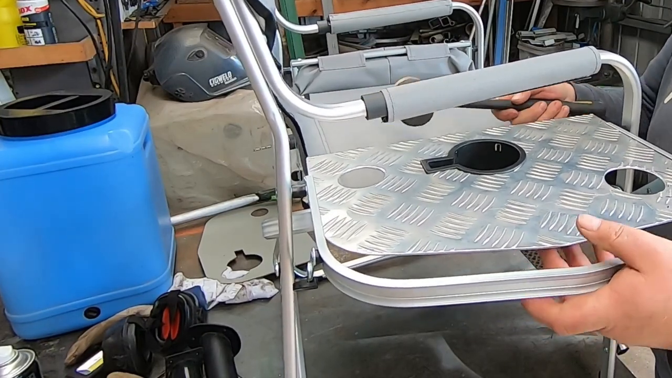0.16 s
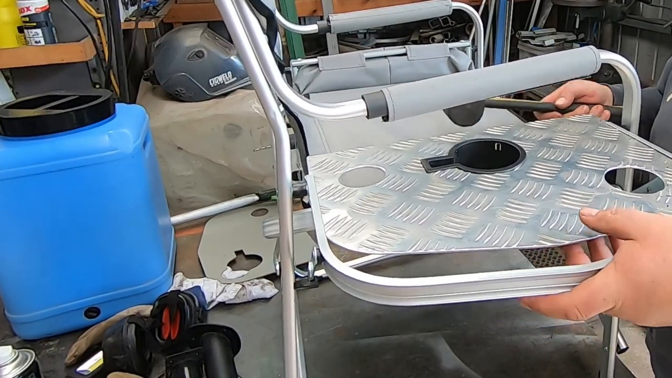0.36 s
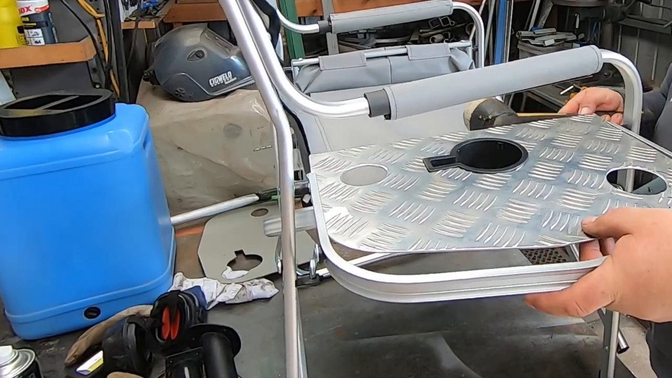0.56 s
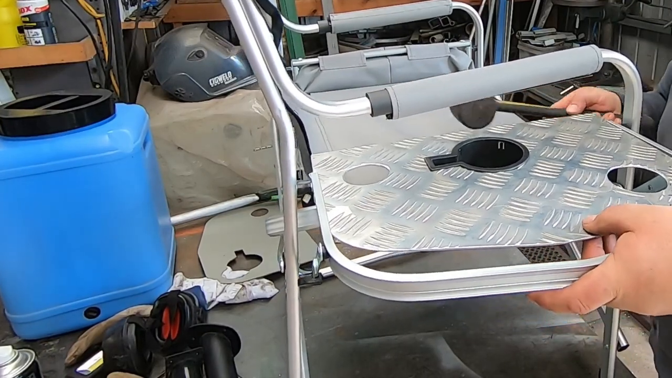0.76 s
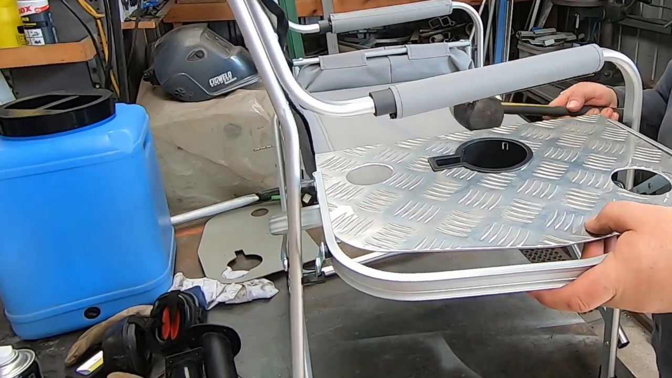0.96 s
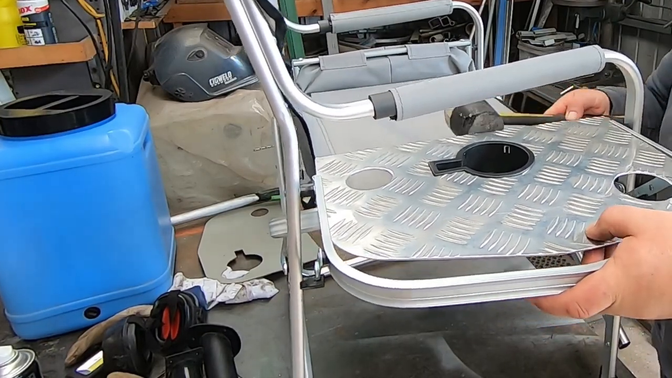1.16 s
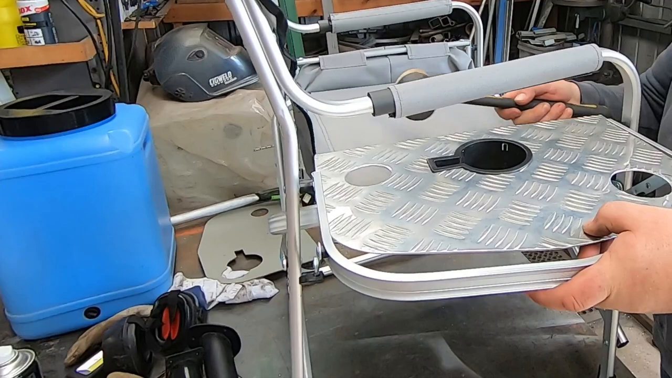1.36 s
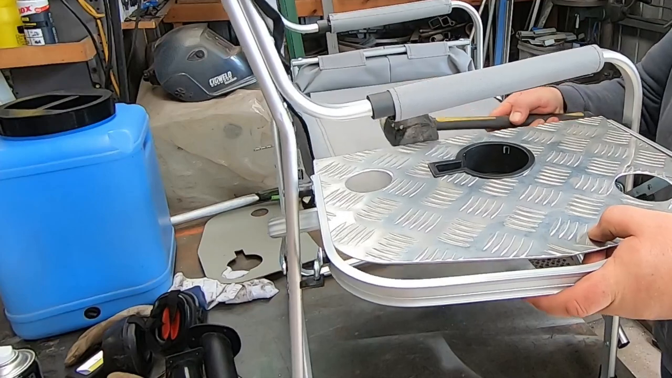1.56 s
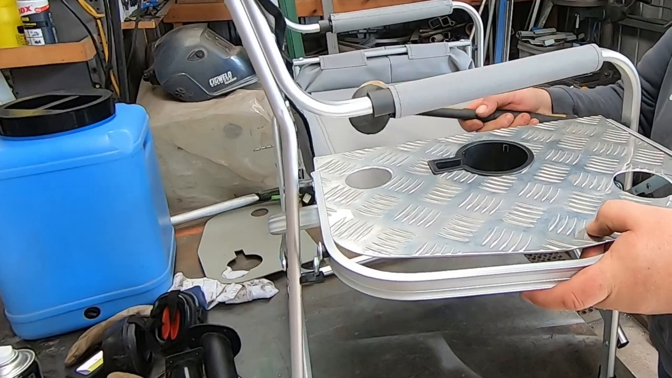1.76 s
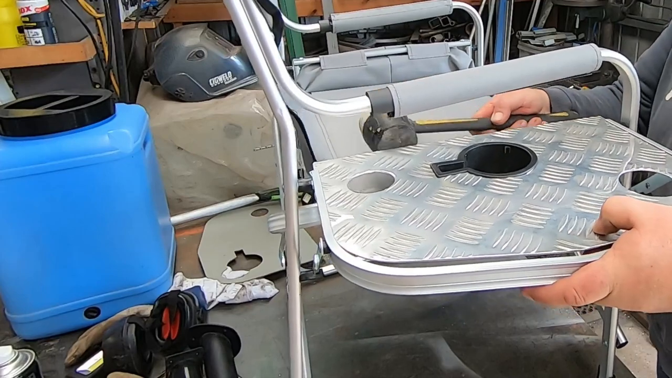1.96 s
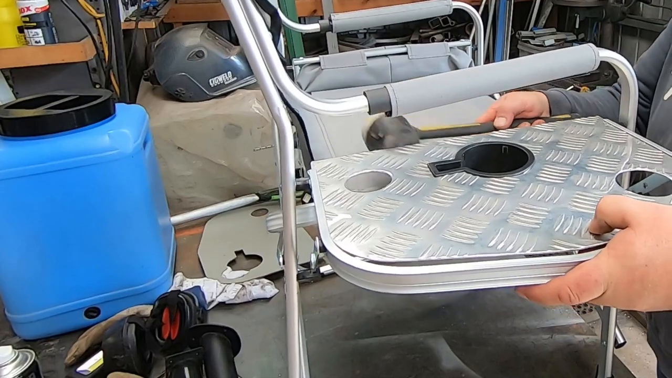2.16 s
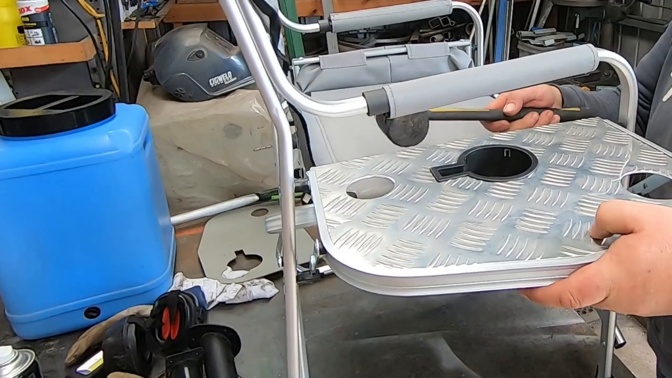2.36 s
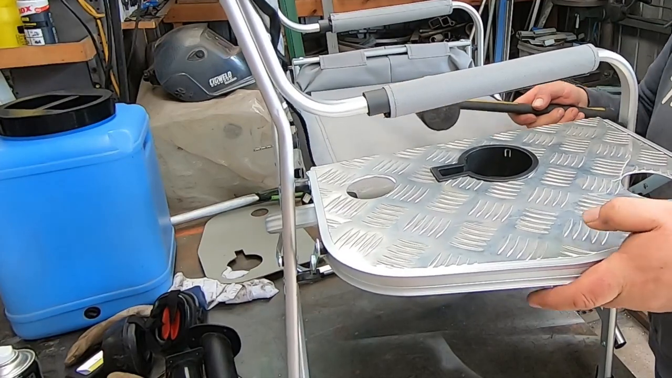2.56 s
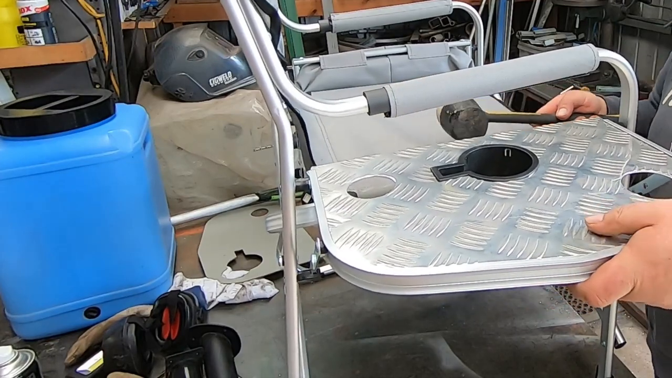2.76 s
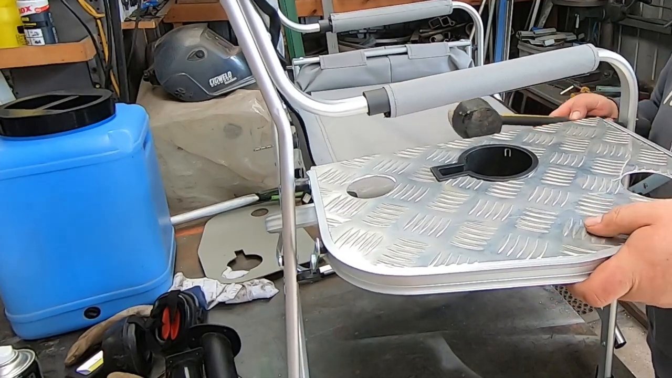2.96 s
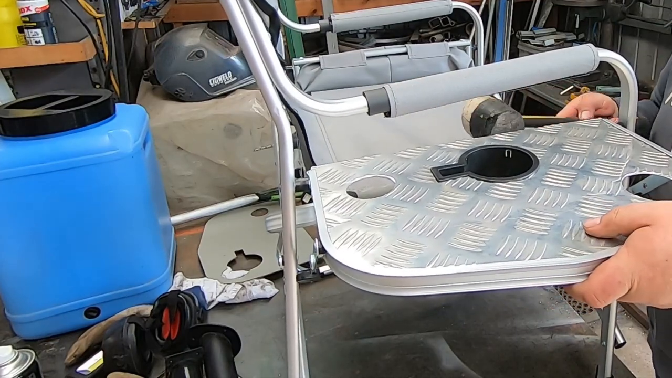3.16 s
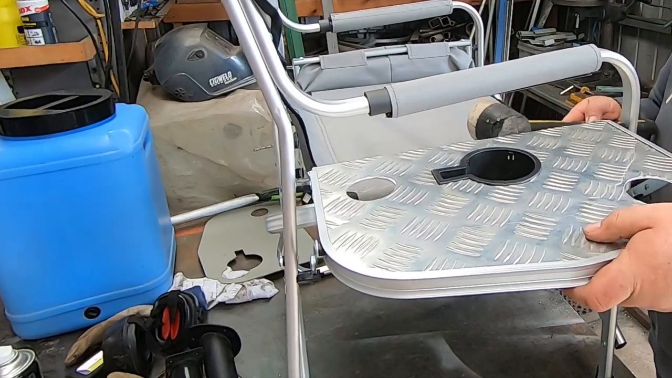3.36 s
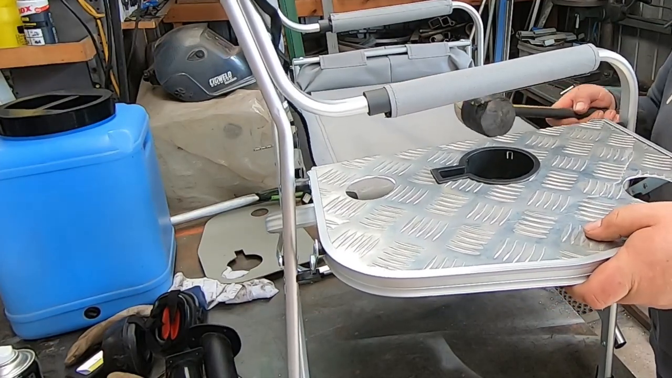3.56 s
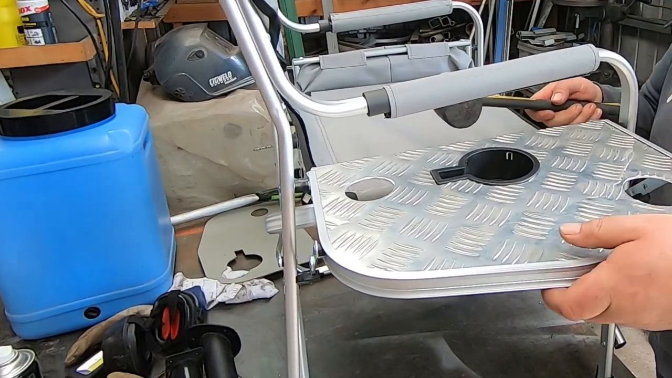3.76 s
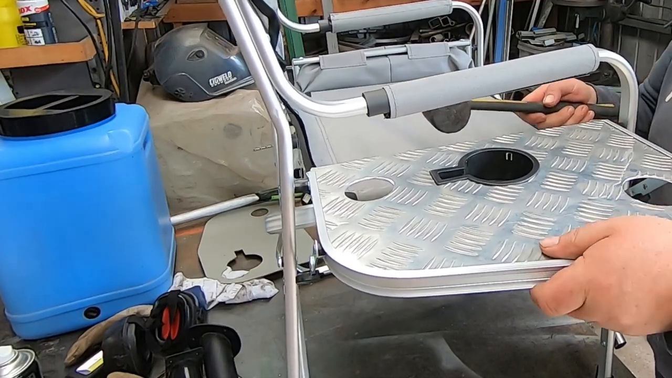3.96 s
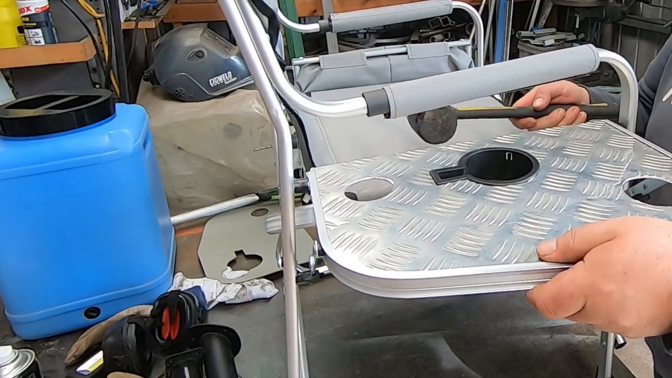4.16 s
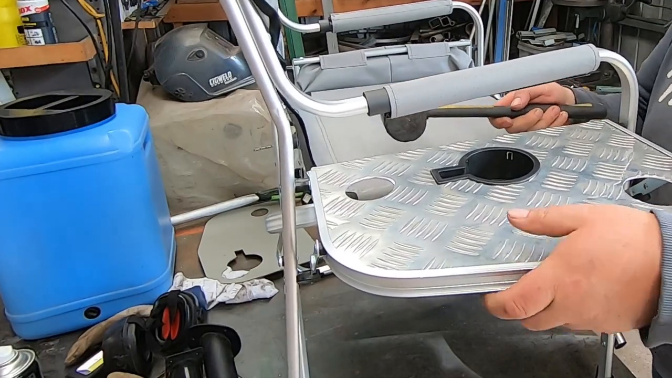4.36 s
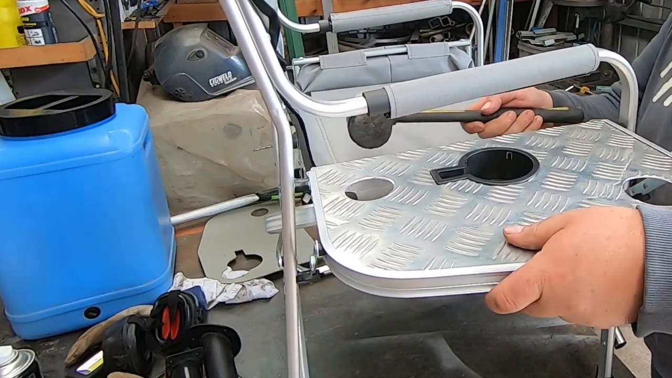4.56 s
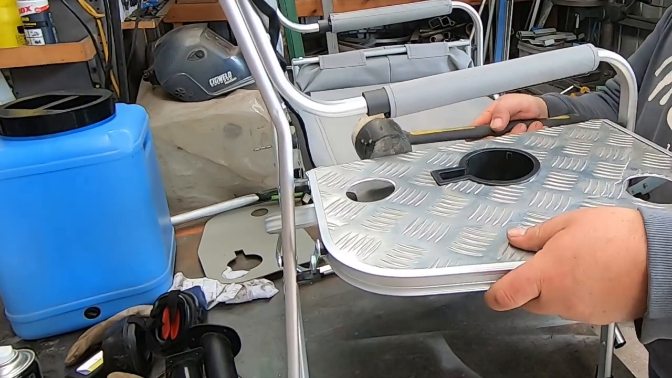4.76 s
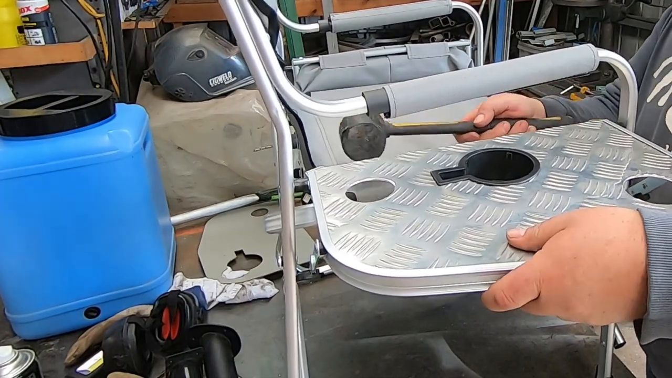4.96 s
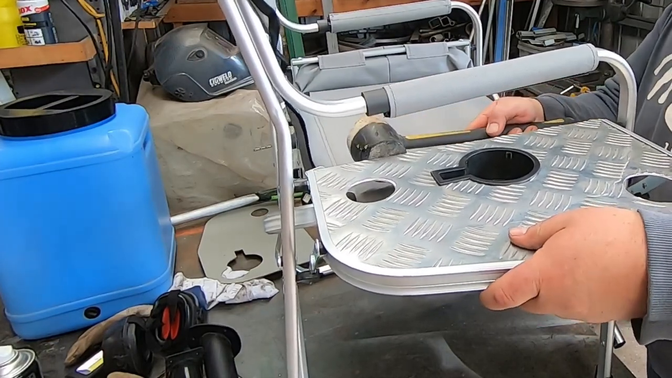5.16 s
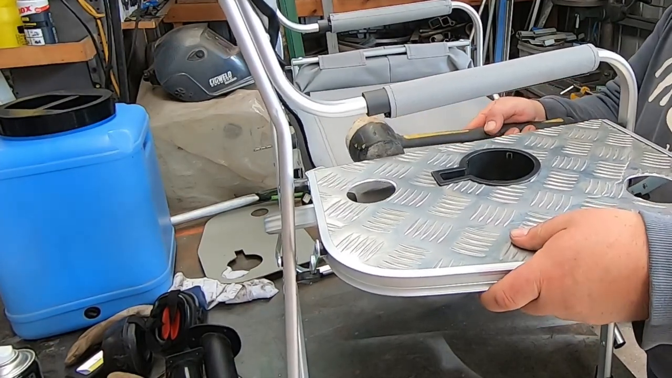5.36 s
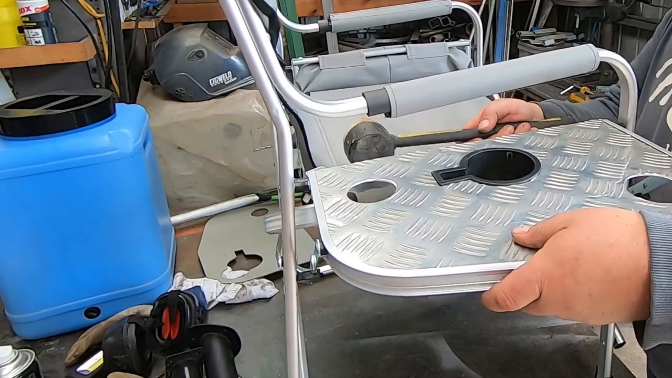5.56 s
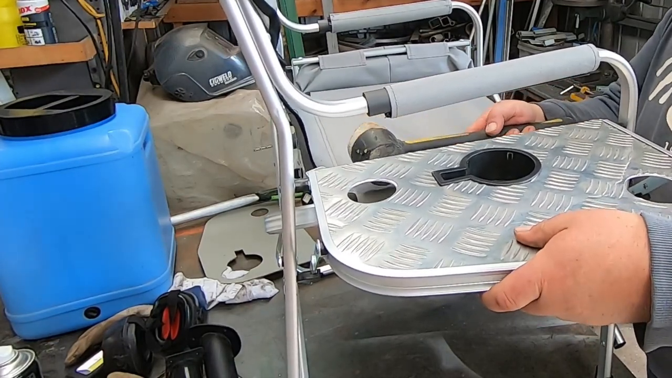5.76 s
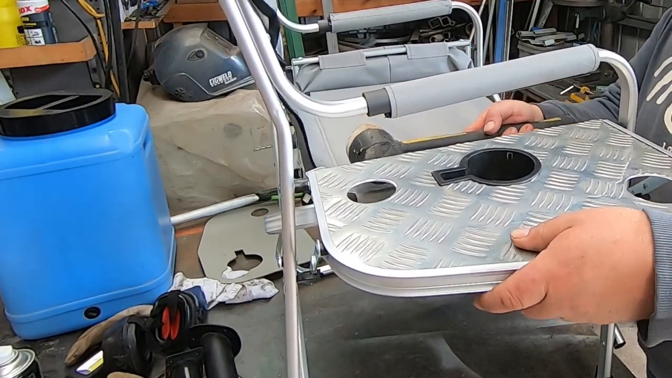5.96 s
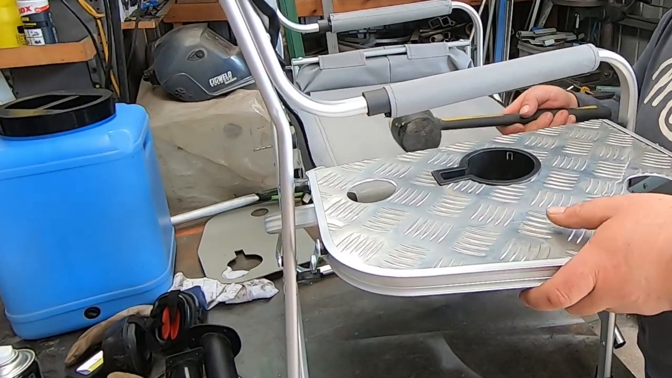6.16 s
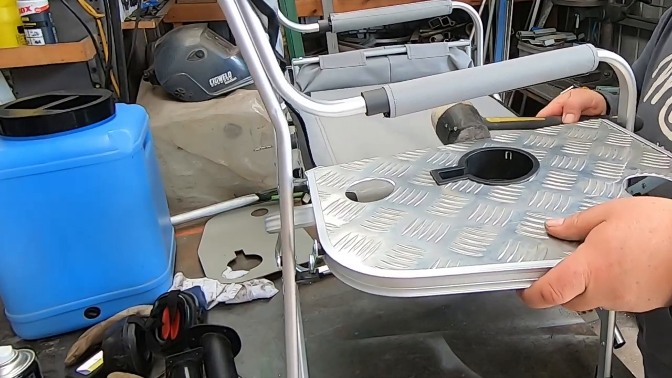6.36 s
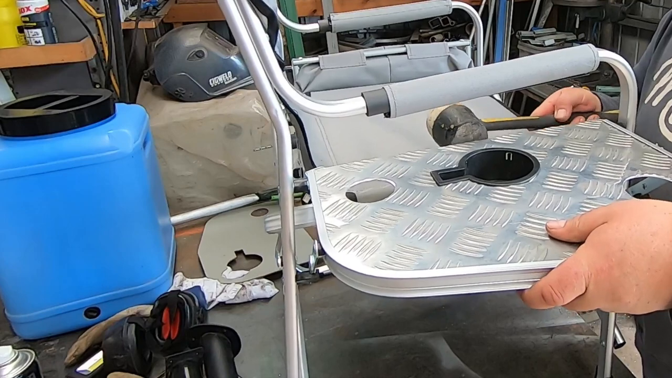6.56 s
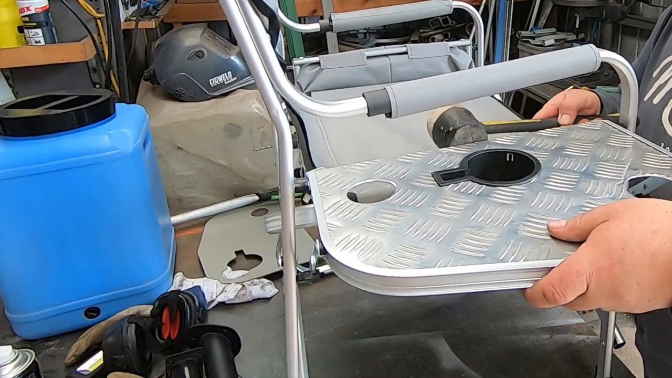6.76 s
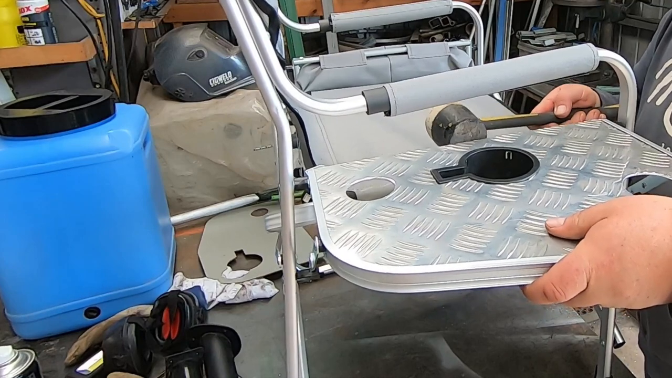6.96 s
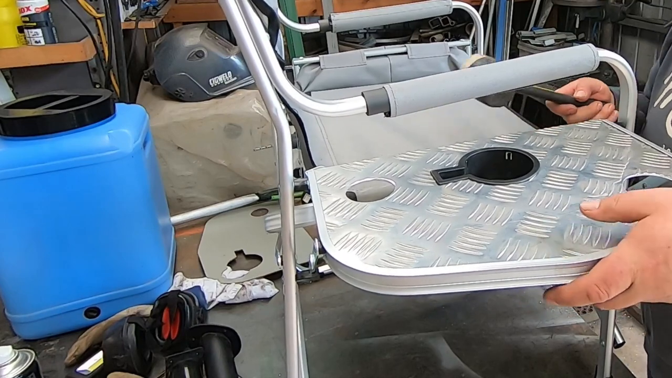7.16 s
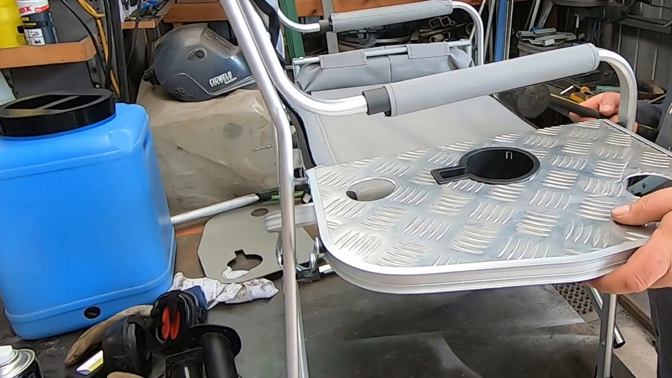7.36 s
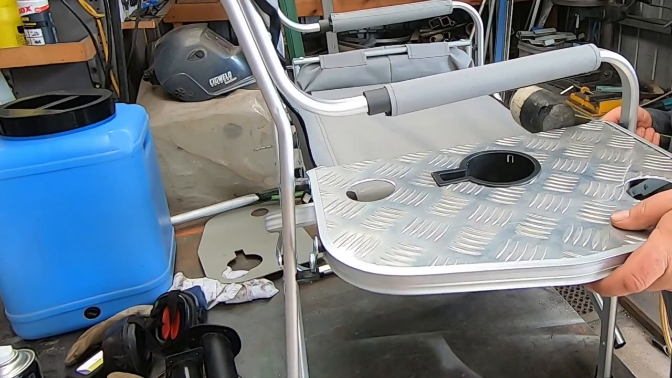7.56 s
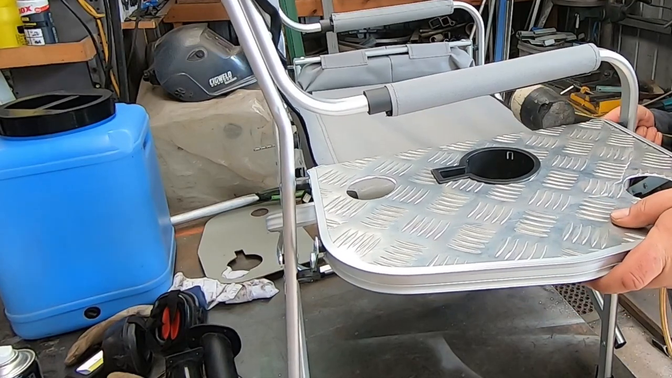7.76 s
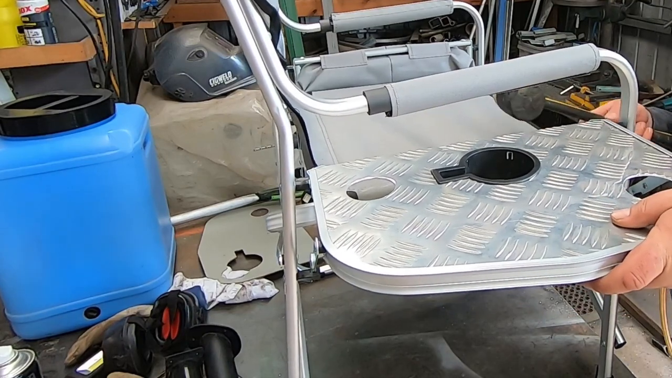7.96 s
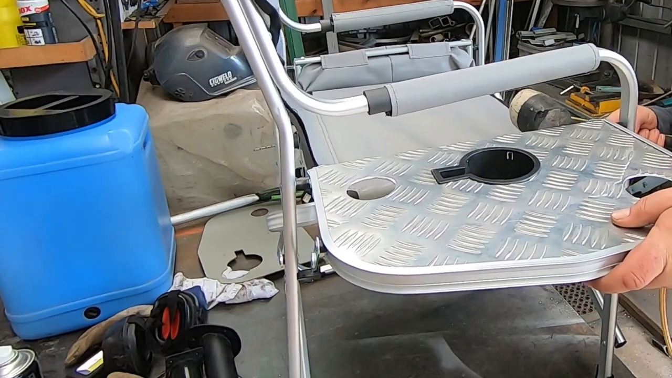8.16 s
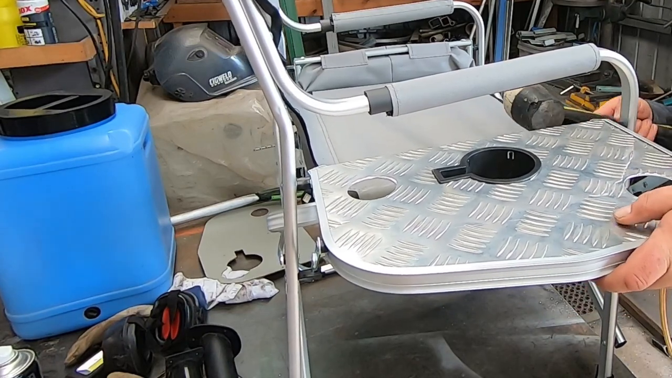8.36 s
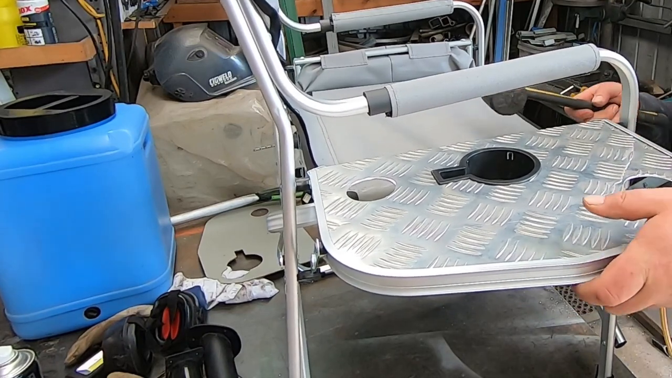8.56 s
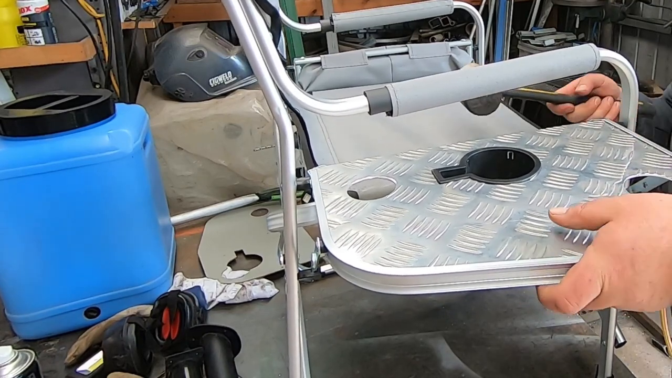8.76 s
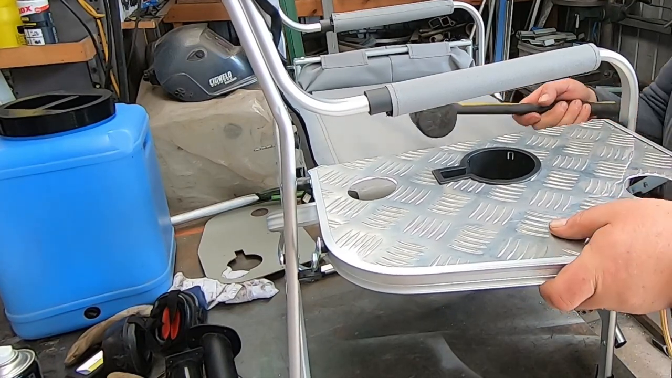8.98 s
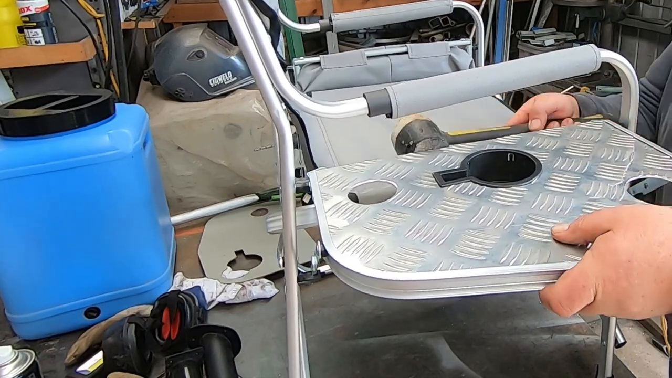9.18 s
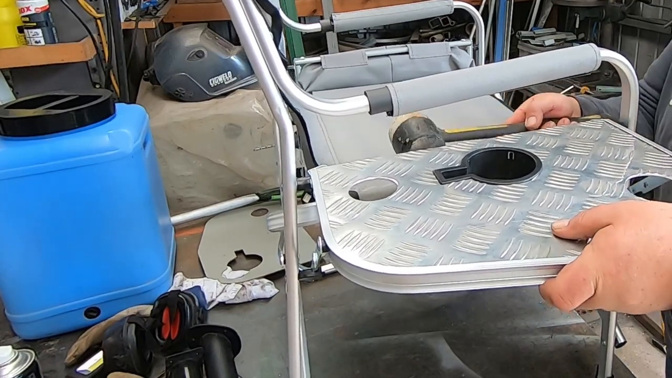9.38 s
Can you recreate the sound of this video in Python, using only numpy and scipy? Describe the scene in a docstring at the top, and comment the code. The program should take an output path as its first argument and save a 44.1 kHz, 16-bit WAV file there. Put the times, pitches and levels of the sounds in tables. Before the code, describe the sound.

Loud, abrupt blows on thin metal plate, each a crack with a nearly simultaneous slap, hollow knock, clattering clang and dull thud, fading in about half a second. A fast first run with bouncing bumps gives way to a weak tap, then separate firmer hits and pairs. Between them the plate ticks and shifts, its rim clinks, and a hand slides briefly along the tube. Close stereo pickup, small live room, faint background hiss.

```python
"""A mallet drives an aluminium tread plate into the tube frame of a folding chair, in a small workshop.
Each blow is a crack and a slap of noise, a hollow knock, coloured noise for the clang and thud, and fading
sine waves for the ringing tubes and the booming, swaying frame. Early on, the loose plate drops back after
every blow; later it sits tighter. Between blows it ticks, bumps and clinks, and the hand rubs along the
frame. A quiet murmur of filtered noise fills the workshop."""
import sys
import numpy as np
from scipy import signal
from scipy.fft import rfft, irfft, next_fast_len
from scipy.io import wavfile

SR = 44100
rng = np.random.default_rng(int(sys.argv[2]) if len(sys.argv) > 2 else 0)


def unload_audio(sound):
    """Save the sound as a 16-bit wav file, at the path given as the first command line argument."""
    columns = np.transpose(np.atleast_2d(sound))
    # keep every value between -1 and 1, then stretch to whole-number steps
    steps = np.round(np.clip(columns, -1, 1) * 32767)
    wavfile.write(sys.argv[1], SR, steps.astype(np.int16))


N = 415411  # length in samples
AGE = np.arange(SR * 9 // 10) / SR  # time since a sound began, s
SEATED_S = 2.9  # from this time the plate's edge sits in the frame: it no longer jumps, and booms differently


def from_db(db):
    """Turn decibels into a gain."""
    return 10 ** (np.asarray(db) / 20)


def at_hz(points, hz):
    """Read a table between its points, on a logarithmic pitch axis."""
    points = np.array(points)
    return np.interp(np.log(hz + 1), np.log(points[:, 0]), points[:, 1])


def add(track, s, sound):
    """Mix a sound in at a time, which may lie before the start."""
    start = round(s * SR)
    first, last = max(start, 0), min(start + sound.shape[-1], N)
    track[:, first:last] += sound[:, first - start:last - start]


def white(size):
    """Two independent noises, one for the middle and one for the sides."""
    return rng.standard_normal((2, size))


# How alike left and right are in the room's sound: (f/Hz, likeness -1..1)
ROOM_ALIKE = [(40, .9), (100, .98), (250, .95), (500, .85), (1000, .42), (2000, .54), (4500, .5),
              (7000, .1), (9000, 0)]
# Left-right balance of the room's sound: (f/Hz, left minus right level/dB)
ROOM_SIDES = [(200, 1.3), (500, -1.5), (1000, -2.5), (2200, -0.73), (4500, -.4), (7000, -2.9), (9000, 3.5)]


def coloured(noise, spectrum, tilt_db=0, likeness=ROOM_ALIKE, balance=ROOM_SIDES):
    """Left and right noise with a spectrum, a tilt per octave above 1 kHz and a stereo image; rms 1."""
    size = noise.shape[-1]
    padded = next_fast_len(size)
    hz = np.fft.rfftfreq(padded, 1 / SR)
    mid, side = rfft(noise, padded)
    alike = at_hz(likeness, hz)
    left_right = np.array([[1], [-1]])
    both = np.sqrt(1 + alike) * mid + left_right * np.sqrt(1 - alike) * side
    level_db = at_hz(spectrum, hz) + tilt_db * np.log2(np.maximum(hz, 1000))
    level_db = level_db + left_right * at_hz(balance, hz) / 2
    out = irfft(both * from_db(level_db) * (hz > 20), padded)[:, :size]
    return out / out.std()


def uneven(noise, depth_db, width_hz):
    """The plate's modes bunch at random, so that some narrow bands stand out."""
    hz = np.fft.rfftfreq(noise.shape[-1], 1 / SR)
    bumps = rng.standard_normal(600)
    level_db = depth_db * np.interp(hz / width_hz, np.arange(len(bumps)), bumps)
    return irfft(rfft(noise) * from_db(level_db), noise.shape[-1])


def swell(rise_s, t60):
    """Height of a vibration that builds up, then dies away by 60 dB in t60 seconds."""
    return np.sqrt(1 - np.exp(-AGE / rise_s)) * from_db(-60 * AGE / t60)


# How long the room rings: (f/Hz, time to fall 60 dB t/s)
ROOM_DECAY = [(60, .6), (200, 0.6), (600, 0.51), (1500, 0.53), (4000, 0.52), (8000, 0.42), (13000, .36)]


def in_room(noise, feed_s, direct):
    """Crowded modes feed the room for a moment; then each band dies at the room's own rate."""
    hz = np.fft.rfftfreq(len(AGE), 1 / SR)
    spectrum = rfft(noise)
    centres, t60s = np.transpose(ROOM_DECAY)
    out = 0
    # each row of the identity matrix picks one band, overlapping its neighbours
    for pick, t60 in zip(np.eye(len(centres)), t60s):
        band = irfft(spectrum * at_hz(np.c_[centres, pick], hz), len(AGE))
        out = out + band * from_db(-60 * AGE / t60)
    straight_power = direct * (1 - np.exp(-AGE / 0.0037))
    room_power = 2 * (1 - np.exp(-AGE / feed_s)) ** 2
    return out * np.sqrt(straight_power + room_power)


def ring(hz, level_db, t60, rise_s, spread_db, phase_spread):
    """Fading sine modes, each struck with its own strength and reaching the two sides out of step."""
    out = 0
    for f, db, decay in zip(hz, level_db, t60):
        phase = rng.uniform(0, 2 * np.pi) + phase_spread * rng.standard_normal((2, 1))
        gain = from_db(db + spread_db * rng.standard_normal())
        out = out + gain * swell(rise_s, decay) * np.sin(2 * np.pi * f * AGE + phase)
    return out


def shifted(hz, share):
    """The frame's stress shifts its modes a little, at random, by a share of their pitch."""
    return hz * (1 + share * rng.standard_normal(len(hz)))


def flutter(per_s):
    """A smooth random wobble around zero, its spread a little under one."""
    steps = rng.standard_normal(2000)
    return np.interp(np.arange(N) / SR * per_s, np.arange(len(steps)), steps)


# The plate's play in the frame, which the blows take up: (t/s, play 1 loose to 0 tight)
LOOSENESS = [(0, 1), (1.63, 1), (1.95, 0.67), (3.47, 0.55), (4.81, .55), (5.2, 0.22), (8.14, 0)]


def with_play(rule, s):
    """A setting (value when tight, change at full play) that follows the plate's play at that time."""
    tight, change = rule
    return tight + change * np.interp(s, *np.transpose(LOOSENESS))


# Tone of metal hitting metal: (f/Hz, relative level/dB per Hz)
CRACK_TONE = [(40, -17.5), (150, -17.5), (400, -13), (900, -3), (1500, 3.5), (2200, 3), (3400, 4.5),
              (5500, 2), (7000, 1), (8500, -10), (10000, -8.5), (11300, -29), (14500, -36.5)]
# How alike left and right are straight from the plate: (f/Hz, likeness -1..1)
DIRECT_ALIKE = [(200, 0.76), (1000, 0.99), (5000, 0.98), (7000, 0.82), (8800, 0.46), (12000, 0.78)]
# Left-right balance straight from the plate: (f/Hz, left minus right level/dB)
DIRECT_SIDES = [(200, 2), (500, 1), (1000, -11), (2200, -3), (4500, -2), (7000, -2), (9000, 1.5)]


def crack(tilt_db, t60):
    """Metal meets metal: a brief burst of bending waves, heard straight from the plate."""
    size = len(AGE) // 10
    waves = uneven(white(size), depth_db=4.0, width_hz=350)
    burst = coloured(waves, CRACK_TONE, tilt_db, DIRECT_ALIKE, DIRECT_SIDES)
    return burst * swell(0.00013, t60)[:size]


# Pairs: (when tight, change at full play). A loose plate sounds duller: tilt in dB per octave.
CONTACT_DB, CRACK_TILT_DB = (-11, -2), (0.5, -1.3)
CONTACT_FOLLOWS = .55  # share of a blow's strength in dB that shows in crack and slap


def contact(s, strength_db, slap_s, slap_db):
    """The mallet's crack and the plate's slap on the tube share the force of one blow."""
    out = np.zeros((2, len(AGE)))
    tilt_db = with_play(CRACK_TILT_DB, s)
    first = crack(tilt_db, t60=0.046)
    second = from_db(slap_db) * crack(tilt_db, t60=0.037)
    lag = round(slap_s * SR)
    out[:, :first.shape[-1]] += first
    out[:, lag:lag + second.shape[-1]] += second
    level_db = with_play(CONTACT_DB, s) + CONTACT_FOLLOWS * strength_db
    return out * from_db(level_db) / np.hypot(1, from_db(slap_db))


# The hollow sound of the mallet head: (f/Hz, relative level/dB, time to fall 60 dB t/s)
HEAD_MODES = [(373, -2, 0.033), (570, -5, 0.023)]
KNOCK_DB = (-28.5, 10.5)  # when tight, change at full play


def knock(s):
    """The hollow mallet head knocks with two short-lived modes."""
    modes = ring(*np.transpose(HEAD_MODES), rise_s=0.00079, spread_db=0.5, phase_spread=0.09)
    return from_db(with_play(KNOCK_DB, s)) * modes


# Thin ringing of the aluminium tubes: (f/Hz, relative level/dB, time to fall 60 dB t/s)
TUBES = [(1070, -18, 0.45), (1260, -16, 0.63), (1530, -19, 0.75), (1572, -13.5, .5), (2550, -23, 0.38),
         (3130, -10.5, 0.5), (3410, -20.5, 0.47), (3470, -39, 0.96), (5820, -14, 0.46), (6777, -15.5, .35),
         (7700, -17.5, .35), (10100, -22.5, 0.39)]
TUBE_DB = (-28.5, 4.5)  # when tight, change at full play


def tube_ring(s):
    """The aluminium tubes ring thinly, each mode slightly off its usual pitch."""
    hz, level_db, t60 = np.transpose(TUBES)
    modes = ring(shifted(hz, .008), level_db, t60, rise_s=.002, spread_db=1.0, phase_spread=0.29)
    return from_db(with_play(TUBE_DB, s)) * modes


def rattle(late_s=.04, fade_db_per_s=110, count=7):
    """The plate chatters on the tube for a moment after a blow, on the whole ever more weakly."""
    out = np.zeros((2, len(AGE)))
    for wait, size in rng.standard_normal((count, 2)):
        s = min(.014 + abs(wait * late_s), .2)
        tick = from_db(2 * size - fade_db_per_s * s) * crack(0, t60=0.019)
        out += np.pad(tick, ((0, 0), (round(s * SR), len(AGE))))[:, :len(AGE)]
    return out


# Tone of the ringing plate: (f/Hz, relative level/dB per Hz)
CLANG_TONE = [(300, -20.5), (700, -8), (1000, -1.5), (1550, -2), (1800, -1), (3100, -2), (3900, -2),
              (4500, -4.5), (5700, -2), (7400, -3), (8600, -7.5), (9900, -7), (11300, -25), (14500, -26)]
CLANG_DB = -22.5
CLANG_TILT_DB = (0.14, -1.3)  # dB per octave: when tight, change at full play


def clang(s, plate, kept_share=0.45):
    """The plate rattles and its crowded modes ring: always the same plate, struck at slightly different spots."""
    modes = np.sqrt(kept_share) * plate + np.sqrt(1 - kept_share) * white(len(AGE))
    modes = uneven(modes, depth_db=0.96, width_hz=160)
    modes = coloured(modes, CLANG_TONE, with_play(CLANG_TILT_DB, s))
    return from_db(CLANG_DB) * (rattle() + in_room(modes, feed_s=0.044, direct=0.72))


# Tone of the jolted chair: (f/Hz, relative level/dB per Hz)
THUD_TONE = [(25, -24.5), (55, -8), (100, -4.5), (200, 0.5), (280, -1.5), (400, -1.5), (650, -3),
             (900, -6.5), (1500, -13.5), (4000, -41.5), (12000, -68)]
THUD_DB = (-30, 5.5)  # when tight, change at full play


def thud(s):
    """The whole chair is jolted: dull noise that feeds the room."""
    jolt = in_room(coloured(white(len(AGE)), THUD_TONE), feed_s=0.053, direct=0.96)
    return from_db(with_play(THUD_DB, s)) * jolt


# Low modes of plate and frame:
# (f/Hz, relative level/dB with the plate loose, relative level/dB with it seated, time to fall 60 dB t/s)
FRAME_MODES = [(67.9, -15.5, -17, 0.54), (100, -2.5, -13, 0.67), (117, -2, -7.5, 0.49),
               (136.4, -3.5, -2, 0.27), (157.9, -12, -3, .35), (202.3, -4, -2.5, 0.46),
               (214.8, -2, -7, 0.47), (268.7, -7, -8, 0.37), (307, -7.5, -15, 0.39), (382.6, -6, -17, 0.63),
               (467.5, -4.5, -17.5, 0.61), (502, -11, -23.5, .6), (572, -11, -19, 0.15),
               (624, -4, -19, 0.53), (674, -5, -23.5, 0.58)]
BOOM_DB = -23.5


def boom(s, boom_db):
    """Plate and frame boom in low modes, whose balance changes once the plate is seated."""
    hz, loose_db, seated_db, t60 = np.transpose(FRAME_MODES)
    mode_db = loose_db if s < SEATED_S else seated_db
    modes = ring(shifted(hz, .012), mode_db, t60, rise_s=0.02, spread_db=3.5, phase_spread=.075)
    return from_db(BOOM_DB + boom_db) * modes


# Mallet blows: (t/s, strength level/dB against a usual blow, delay of the plate's slap on the tube t/s,
# slap level/dB against the crack, boom level/dB against the strength)
HITS = [(-.022, 2, .0065, -6, -8), (0.5535, -2.04, .0058, 2, -9), (0.9135, 0.5, 0.0043, 6, -7.5),
        (1.2587, -.5, 0.01, 0.5, -3.5), (1.6338, 0, .0084, 3, -4.5), (1.951, -2, .003, -4, -8),
        (2.293, -4, 0.0092, -0.5, -5), (3.1577, -12, .013, 10, 2), (3.4682, -4, .006, 3, 0),
        (4.8107, 0.1, .0078, -2.5, 0), (5.1955, 2, 0.0017, 0, -1), (6.4076, -2, 0.006, 2, -4),
        (6.8584, 1.5, 0.0015, -5, -3), (7.6789, 0.9, .0055, -1, -5.5), (8.1404, 0, 0.007, -6.5, 1),
        (9.2545, -1, .0018, 13, -6.5)]


def hammering():
    """Each blow cracks and slaps, knocks, clangs, rings the tubes, jolts the chair and makes it boom."""
    out = np.zeros((2, N))
    plate = uneven(white(len(AGE)), depth_db=2.0, width_hz=70)
    for s, strength_db, slap_s, slap_db, boom_db in HITS:
        body = knock(s) + clang(s, plate) + tube_ring(s) + thud(s) + boom(s, boom_db)
        add(out, s, contact(s, strength_db, slap_s, slap_db) + from_db(strength_db) * body)
    return out


# Centres of clusters of close modes that sing on:
# (f/Hz, level/dB of each mode before its random spread, time to fall 60 dB t/s)
SINGING = [(1225, -40.5, 0.4), (1930, -44, 0.32), (3030, -48, 0.44), (3400, -44, 0.58), (3620, -38, 0.35),
           (3700, -43, 0.46)]
SINGING_S = 3.472  # one blow lands where the frame is free to sing
SWAY_HZ, SWAY_T60, SWAY_DB = 46, 0.5, -49  # Hz, s, dB at a usual blow


def frame_ring(cluster_width=.014, count=4):
    """The whole chair sways deeply under each blow; once its tubes sing on, beating against each other."""
    out = np.zeros((2, N))
    for s, strength_db, *_ in HITS:
        sway_db = strength_db + SWAY_DB
        add(out, s, ring([SWAY_HZ], [sway_db], [SWAY_T60], rise_s=.06, spread_db=2.5, phase_spread=.35))
    hz, level_db, t60 = np.transpose(SINGING * count)
    hz = shifted(hz, cluster_width)
    add(out, SINGING_S, ring(hz, level_db, t60, rise_s=.002, spread_db=2.5, phase_spread=0.34))
    return out


# Tone of the quiet workshop: (f/Hz, relative level/dB per Hz)
SHOP_TONE = [(25, -12), (60, -9.5), (90, -21), (160, -1), (210, 0.5), (320, -8), (500, -11.5), (830, -9),
             (1500, -13), (4000, -21.5), (6500, -24.5), (10000, -37), (11500, -52), (15000, -54.5)]
SHOP_DB = -57.5


def background():
    """The workshop's quiet low murmur and hiss: filtered noise whose level wavers slightly."""
    return from_db(SHOP_DB + .7 * flutter(per_s=6.3)) * coloured(white(N), SHOP_TONE)


# Tone of the plate dropping back: (f/Hz, relative level/dB per Hz)
DROP_TONE = [(30, -24), (70, -14), (110, 9), (210, 6), (300, -2), (450, -1), (700, -2), (1000, -7),
             (1600, -8.5), (4000, -44), (12000, -56)]
# How hard it lands, until its edge catches in the frame: (t/s, level/dB against the blow)
LANDING_FORCE = [(0, -12.5), (.91, -1.5), (1.95, 1.5), (2.3, -14)]
FLIGHT_S, DROP_DB = .128, -23.5  # a loose plate lands this long after the blow


def drops(room_db=-9):
    """The loose plate jumps at a blow and lands with a dull bump that echoes in the room."""
    out = np.zeros((2, N))
    for s, strength_db, *_ in HITS:
        if s < SEATED_S:
            bump = coloured(white(len(AGE)), DROP_TONE) * swell(0.022, 0.26)
            echo = in_room(coloured(white(len(AGE)), DROP_TONE), feed_s=0.11, direct=0)
            db = DROP_DB + strength_db + np.interp(s, *np.transpose(LANDING_FORCE))
            add(out, s + FLIGHT_S, from_db(db) * (bump + from_db(room_db) * echo))
    return out


# The plate shifting in the frame: (t/s, tick level/dB, bump level/dB)
SHIFTS = [(.382, -38.5, -38.5), (0.8304, -34.5, -49), (2.238, -51, -41), (2.6004, -65, -41),
          (2.63, -40.5, -65), (3.2451, -37.5, -46), (4.789, -42.5, -45), (5.161, -64.5, -39),
          (6.694, -65, -42.5), (6.821, -35.5, -40), (7.421, -44, -59), (7.5958, -65, -45),
          (7.619, -51.5, -65), (8.108, -44.5, -46.5)]
# Tone of the soft bumps: (f/Hz, relative level/dB per Hz)
BUMP_TONE = [(30, -24), (90, -12.5), (150, -2), (210, 3), (320, -5), (480, -3), (750, -9), (1500, -19),
             (4000, -23.5), (12000, -56)]
NUDGE_TILT_DB = 1  # per octave


def nudges(tick_room_db=-13):
    """The plate shifts against the tube: light ticks with a clanging echo, and soft bumps."""
    out = np.zeros((2, N))
    for s, tick_db, bump_db in SHIFTS:
        echo = in_room(coloured(white(len(AGE)), CLANG_TONE, NUDGE_TILT_DB), feed_s=0.13, direct=0.78)
        bump = in_room(coloured(white(len(AGE)), BUMP_TONE), feed_s=.25, direct=0.52)
        bump = bump * (1 - np.exp(-AGE / .004))  # a soft start
        add(out, s, from_db(tick_db) * crack(NUDGE_TILT_DB, t60=0.043))
        add(out, s, from_db(tick_db + tick_room_db) * echo + from_db(bump_db) * bump)
    return out


def faint_ticks(level_db=-61, tilt_db=-2, count=16):
    """The held plate is never quite still: it ticks faintly at random."""
    out = np.zeros((2, N))
    for when, size in rng.random((count, 2)):
        add(out, when * N / SR, from_db(level_db + 5 * size) * crack(tilt_db, t60=0.04))
    return out


# The plate's rim clinking dully on the tube: (t/s, level/dB against the usual clink)
RIM_TOUCHES = [(4.0, 1), (4.048, -6.5), (4.2422, -6), (8.408, 2.5), (8.547, -8)]
# What the rim rings with: (f/Hz, level/dB at a usual clink, time to fall 60 dB t/s)
RIM_MODES = [(1130, -54, 0.16), (1500, -47, 0.13), (1636, -54, 0.13), (1950, -51, .1)]


def clink(tick_db=-44, tilt_db=-6):
    """Light touches of the rim: a dull tick that wakes only a few middle modes."""
    out = np.zeros((2, N))
    for s, db in RIM_TOUCHES:
        modes = ring(*np.transpose(RIM_MODES), rise_s=.001, spread_db=0, phase_spread=0.76)
        add(out, s, from_db(db + tick_db) * crack(tilt_db, t60=0.065))
        add(out, s, from_db(db) * modes)
    return out


# The hand rubbing along the frame as it changes its grip:
# (t/s, length t/s, level/dB before the swell and fade, tilt level/dB per octave)
SLIDES = [(4.242, 0.14, -54.5, 4), (4.38, .28, -52, -1.5)]
# Tone of the rub: (f/Hz, relative level/dB per Hz before the tilt)
RUB_TONE = [(20, -1), (42, -6), (80, -15), (160, -32), (500, -13), (1800, -17), (6000, -27), (10000, -39.5),
            (12000, -54.5)]


def rubs(halting_db=3):
    """Each slide of the hand is noise that swells and fades, catching as it goes."""
    out = np.zeros((2, N))
    for s, length_s, db, tilt_db in SLIDES:
        size = round(length_s * SR)
        halting = from_db(db + halting_db * flutter(per_s=45)[:size])
        add(out, s, halting * np.hanning(size) * coloured(white(size), RUB_TONE, tilt_db))
    return out


def scene():
    """All sources mixed together."""
    chair = hammering() + frame_ring() + background() + drops()
    return chair + nudges() + faint_ticks() + clink() + rubs()


CUTOFF_HZ = 14700


def record(dry, top=2.1):
    """The tallest peaks are rounded and everything above the cutoff is filtered away."""
    rounded = top * np.tanh(dry / top)
    return signal.sosfilt(signal.cheby1(12, .3, CUTOFF_HZ, fs=SR, output="sos"), rounded)


dry = scene()
out = record(dry)
unload_audio(out)
```